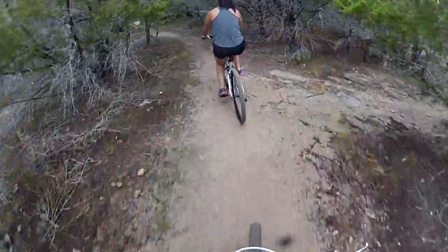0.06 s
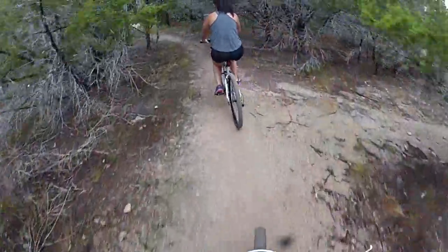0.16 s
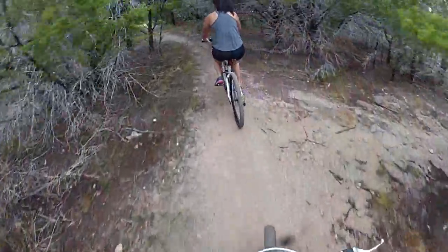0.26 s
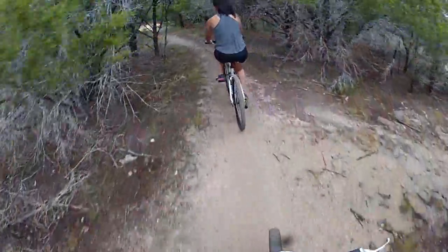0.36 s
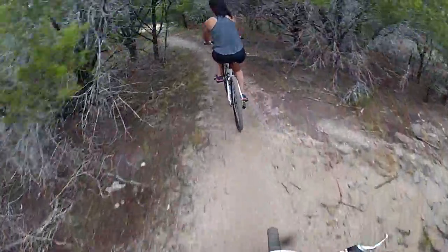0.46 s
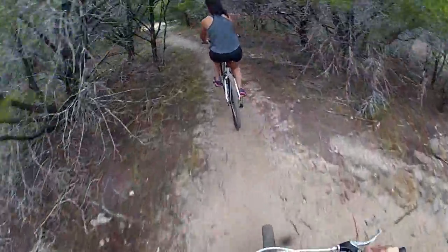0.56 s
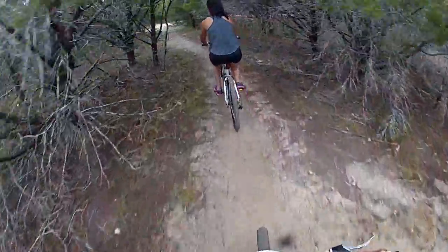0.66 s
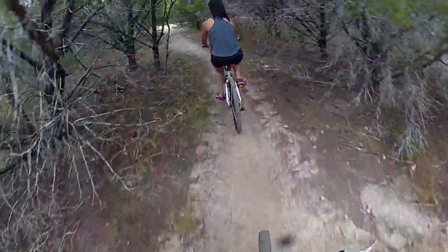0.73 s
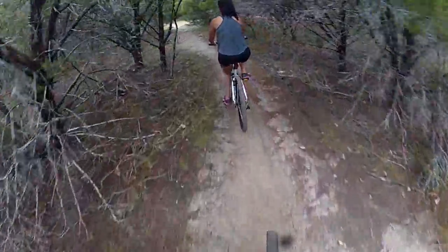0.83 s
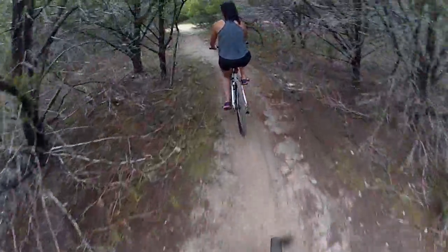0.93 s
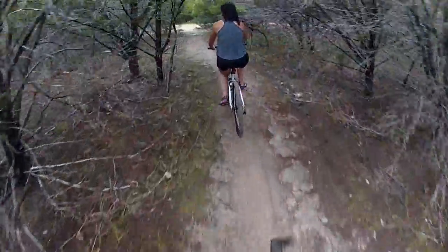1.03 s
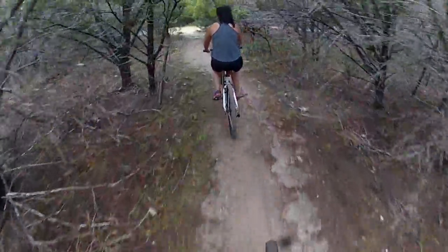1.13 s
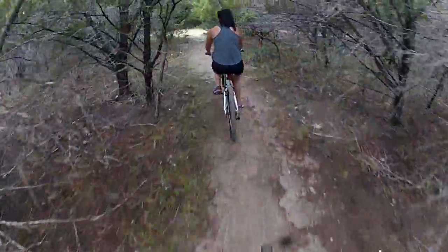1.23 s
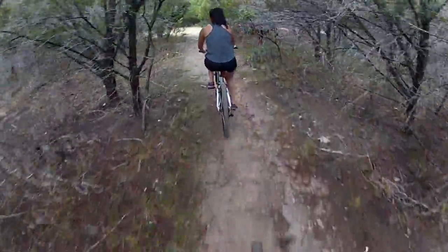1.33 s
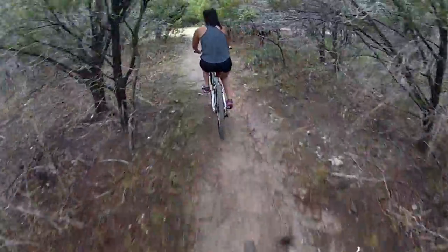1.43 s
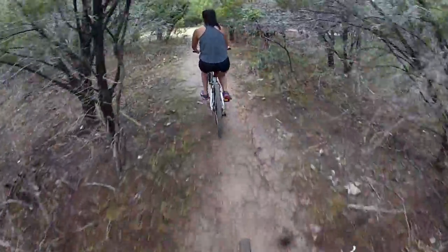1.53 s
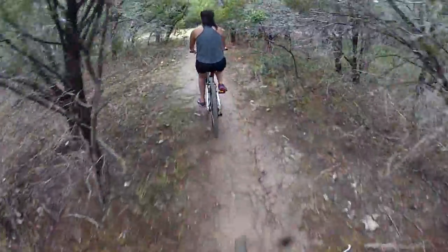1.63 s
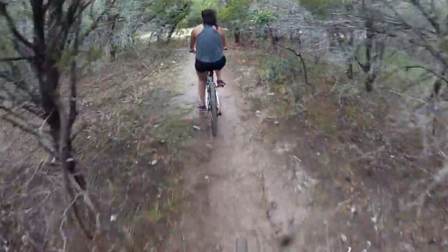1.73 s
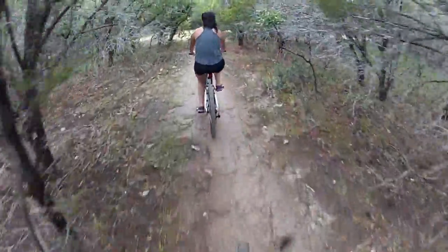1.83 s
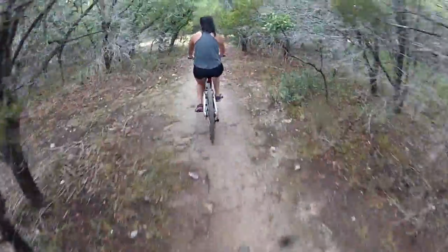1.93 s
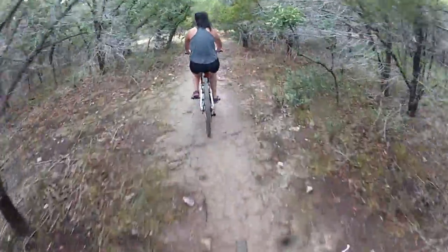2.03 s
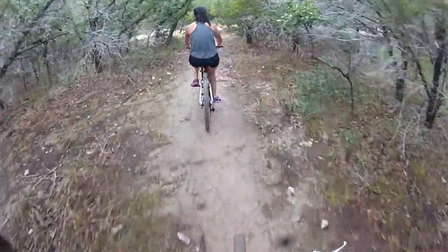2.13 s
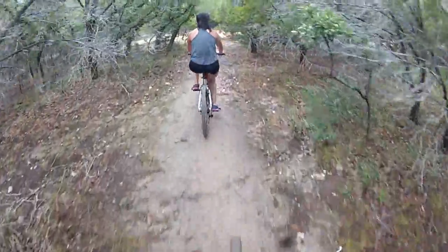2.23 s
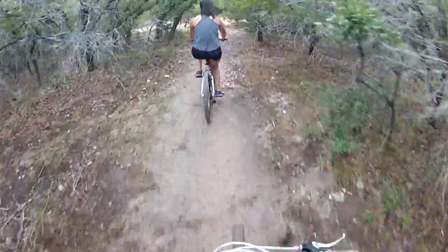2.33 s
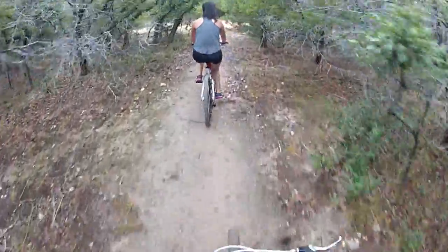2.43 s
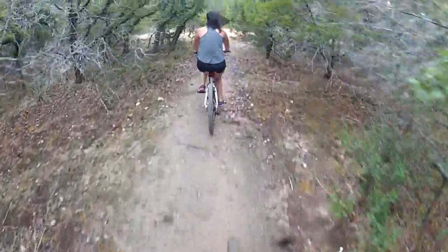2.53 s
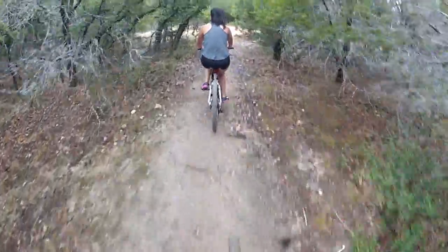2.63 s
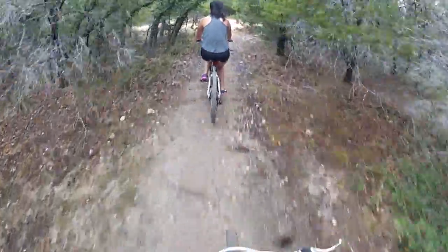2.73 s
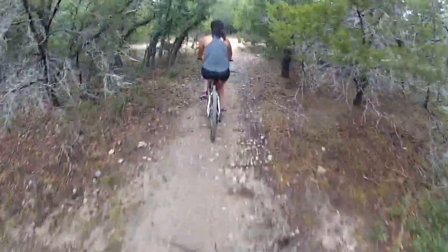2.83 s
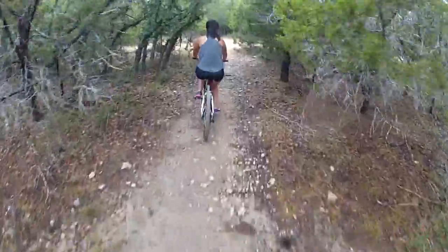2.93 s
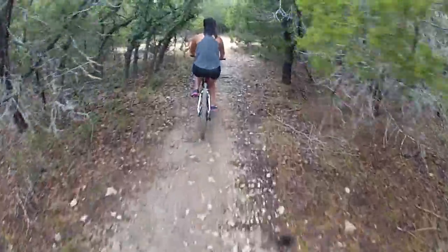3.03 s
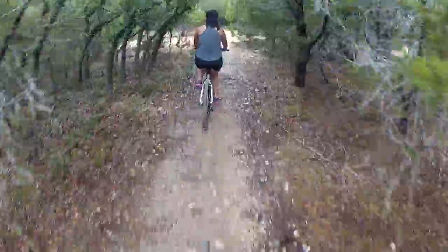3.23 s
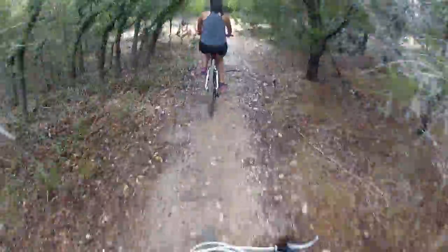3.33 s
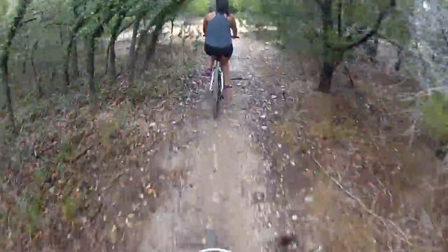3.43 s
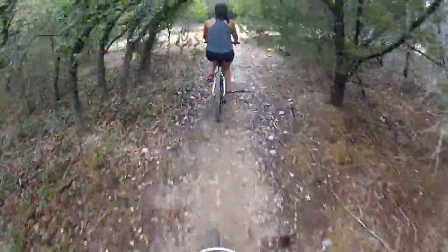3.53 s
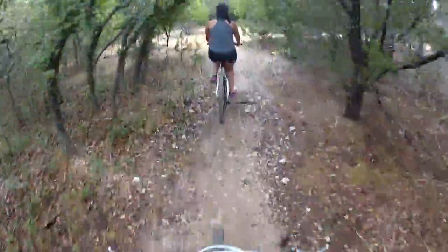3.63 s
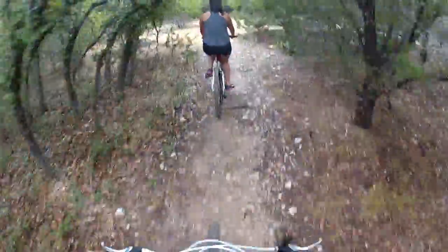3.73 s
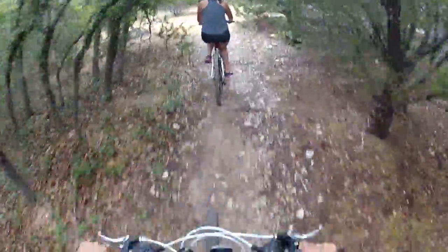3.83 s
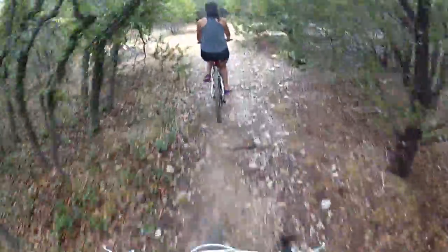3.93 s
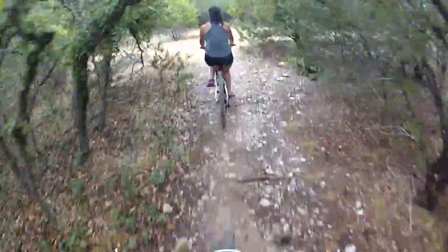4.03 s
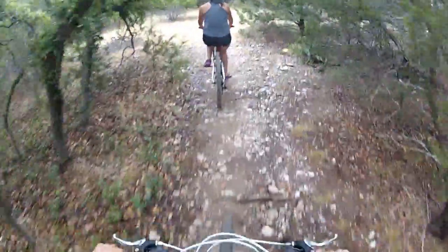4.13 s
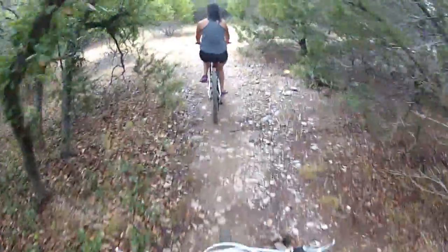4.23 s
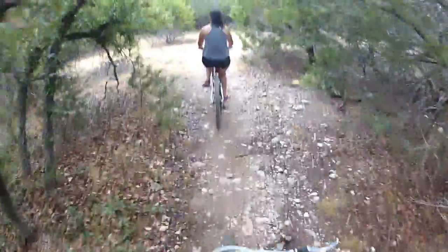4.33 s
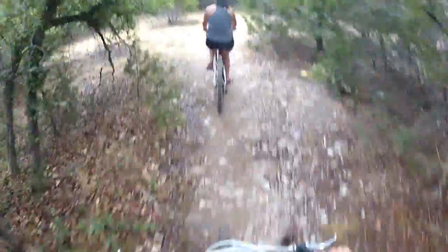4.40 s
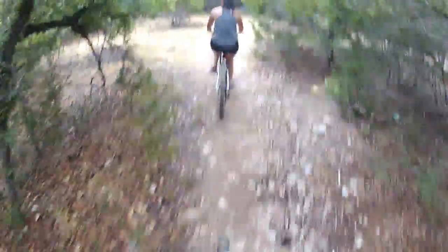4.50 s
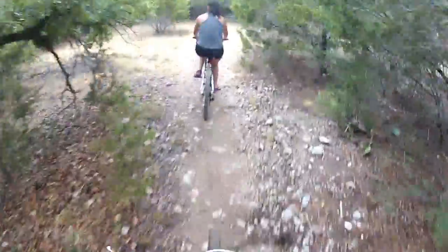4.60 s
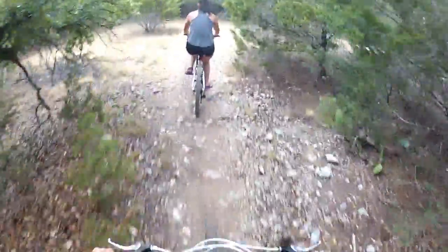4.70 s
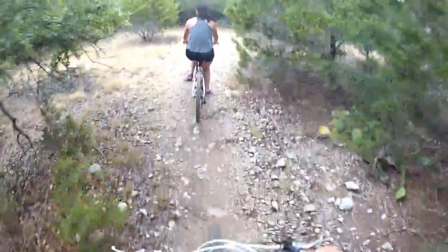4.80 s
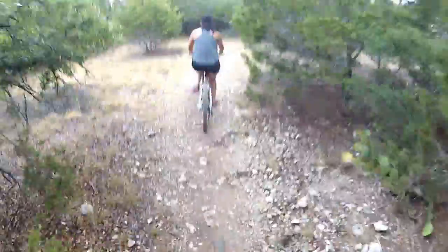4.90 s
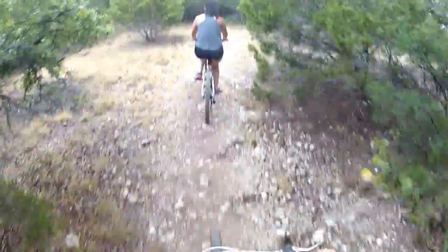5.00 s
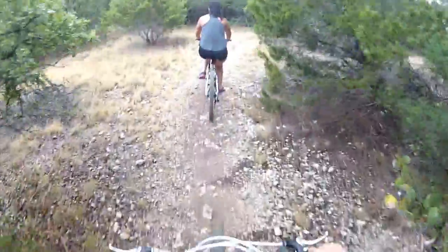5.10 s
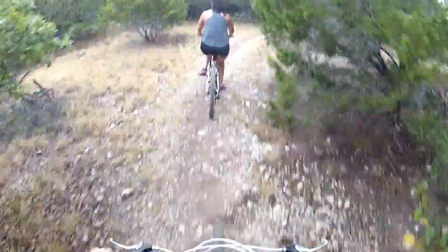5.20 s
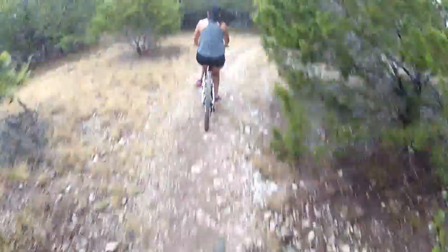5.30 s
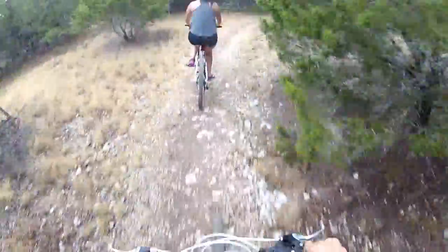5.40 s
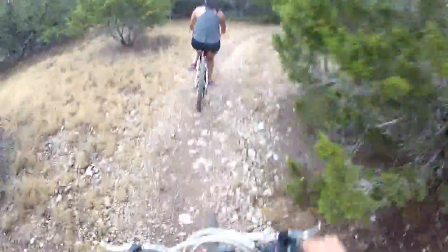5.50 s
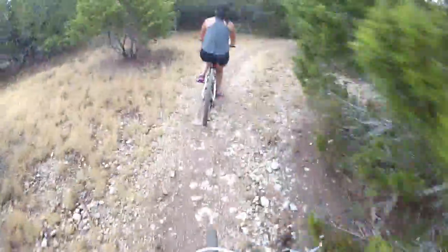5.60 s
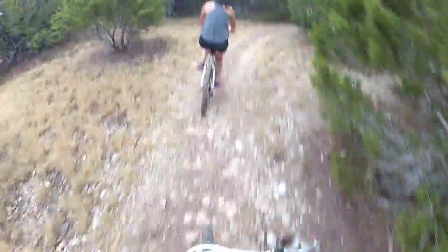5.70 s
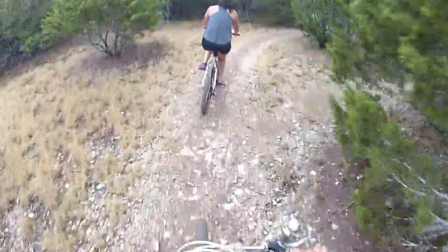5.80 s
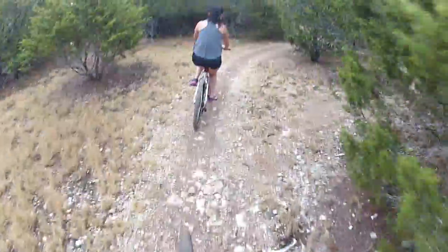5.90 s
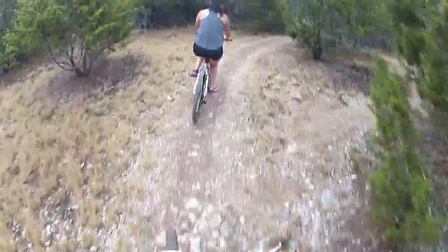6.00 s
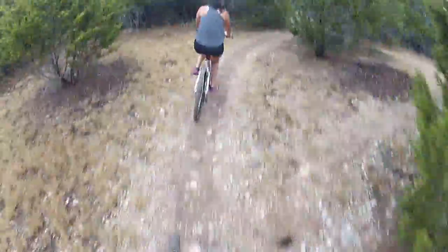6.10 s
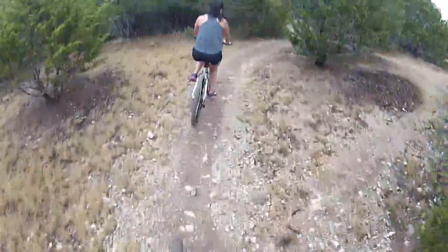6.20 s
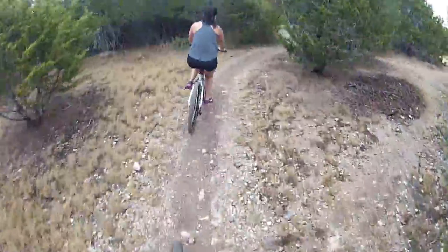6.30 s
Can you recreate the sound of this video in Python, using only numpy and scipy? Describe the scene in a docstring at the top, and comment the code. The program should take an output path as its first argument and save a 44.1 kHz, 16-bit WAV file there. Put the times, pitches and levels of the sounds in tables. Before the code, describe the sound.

Low wind buffets a microphone carried by a cyclist on an outdoor dirt trail. The tyres give a quiet hum and gritty hiss with occasional ticks, before the chain and cables start to rattle. Halfway through, the bike hits loose rock, and irregular sharp knocks, dull thuds and deep bumps build over a busy clatter. A few very faint, thin chirps sit far in the background.

```python
"""A mountain bike rolls from smooth dirt onto loose rock, heard from a camera on the rider.
The tyres hum, hiss and snap over grit while gusts and sway rumble on the microphone.
Stones knock through the frame and thud in the camera mount, chain and cables clatter
as the bike shakes, and deep jolts swing the camera. A few thin chirps sit far back."""
import sys
import numpy as np
from scipy import signal
from scipy.fft import rfft, irfft
from scipy.io import wavfile
from scipy.ndimage import uniform_filter1d

SR = 44100
rng = np.random.default_rng(int(sys.argv[2]) if len(sys.argv) > 2 else 0)


def output_pcm(signal):
    """Save a mono or channel-first signal as 16-bit PCM at the path in sys.argv[1].

    Samples are clipped to [-1, 1] before scaling.
    """
    pcm = np.clip(np.atleast_2d(signal).T, -1, 1) * 32767
    wavfile.write(sys.argv[1], SR, np.round(pcm).astype(np.int16))


N = 280035
TIME = np.arange(N) / SR


def from_db(db):
    """Decibels to gain."""
    return 10 ** (np.asarray(db) / 20)


def rms_one(x):
    """Scale to rms 1."""
    return x / np.sqrt(np.mean(x ** 2) + 1e-20)


def curve(points):
    """A fader move: straight lines through (time_s, value) points."""
    return np.interp(TIME, *np.transpose(points))


def cut(x, hz, kind, order=2):
    """Butterworth filter."""
    return signal.sosfilt(signal.butter(order, hz, kind, fs=SR, output="sos"), x + 1e-18)


def noise(colour):
    """Noise coloured by (freq_hz, gain_db) points, rms 1."""
    hz, db = np.transpose(colour)
    bins_hz = np.fft.rfftfreq(N, 1 / SR)
    shape_db = np.interp(np.log(bins_hz + 1), np.log(hz), db, right=-120)
    return rms_one(irfft(rfft(rng.standard_normal(N)) * from_db(shape_db), N))


def drift(per_s):
    """A random wander with a spread near 1."""
    return np.interp(TIME * per_s, np.arange(N), rng.standard_normal(N))


def steady(x, samples):
    """Even out the swells of a noise over a sliding window."""
    return x / np.sqrt(uniform_filter1d(x * x, samples) + 1e-9)


def resonance(x, hz, width_hz):
    """Two-pole resonance with gain 1 at its peak."""
    radius = np.exp(-np.pi * width_hz / SR)
    feedback = [1, -2 * radius * np.cos(2 * np.pi * hz / SR), radius ** 2]
    return signal.lfilter(np.array([1, 0, -1]) * (1 - radius ** 2) / 2, feedback, x + 1e-18)


def grains(per_s, spread_db):
    """Tiny contacts at random moments and of uneven size, rms 1."""
    sizes = from_db(spread_db * np.minimum(rng.exponential(1, N), 3))
    signs = rng.choice([-1, 1], N)
    return rms_one(sizes * signs * (rng.random(N) < per_s / SR))


def add(track, start_s, sound):
    """Mix a sound into a track from start_s on."""
    at = max(0, round(start_s * SR))
    track[at:at + len(sound)] += sound[:max(0, N - at)]


def hump(peak_s, width_s):
    """A bell-shaped swell of height 1."""
    return np.exp(-.5 * np.minimum(((TIME - peak_s) / width_s) ** 2, 100))


# Fader of the tread hum, before trim and roughness: time_s, level_db
HUM_LEVEL = [(0.0, -68), (1.64, -66.5), (4.4, -63.5), (4.54, -61.5), (5.09, -67), (5.64, -64), (5.92, -66),
             (6.35, -64)]
# Low, warm colour of the tread: freq_hz, gain_db
HUM_COLOUR = [(50, -6), (90, -2.5), (130, 1.5), (190, -0.5), (260, -3), (350, -6.5), (500, -12),
              (800, -20.5), (2000, -56)]


def tyre_hum(trim_db=2.0, rough_loss_db=-4):
    """The tread hums on packed dirt and loses some of its hum on rough ground."""
    rough_db = curve(TRAIL_ROUGHNESS)
    looseness = (rough_db - rough_db.min()) / np.ptp(rough_db)
    level = from_db(curve(HUM_LEVEL) + trim_db + rough_loss_db * looseness)
    return level * steady(noise(HUM_COLOUR), samples=2500)


# Fader of the dirt under the tyres, held after its last point: time_s, level_db
DIRT_LEVEL = [(0, -70.5), (.25, -74.5), (1.25, -74), (1.42, -74), (2.4, -75)]
# Colour of the dirt hiss: freq_hz, gain_db
DIRT_COLOUR = [(290, -45), (500, -5), (847, -8), (1130, -1), (1230, -5), (1650, -11.5), (2130, -4.5),
               (2610, -7.5), (2880, -8.5), (5160, -17.5), (6120, -18.5), (8860, -21.5), (11400, -34),
               (15000, -24)]


def dirt_hiss(grit_db=-13, grit_hz=2880):
    """Tyres on packed dirt: a soft hiss with tiny ringing ticks of grit."""
    hiss = from_db(1.15 * drift(per_s=90)) * noise(DIRT_COLOUR)
    ticks = resonance(grains(per_s=400, spread_db=7.5), grit_hz, width_hz=170)
    return from_db(curve(DIRT_LEVEL)) * (hiss + from_db(grit_db) * rms_one(ticks))


# Gusts at the microphone: time_s, level_db
GUST_LEVEL = [(0, -59), (0.6, -55), (0.73, -70.5), (1.19, -41.5), (1.29, -58.5), (1.43, -50.5), (1.57, -64),
              (1.76, -47), (1.87, -57.5), (2.08, -54), (2.68, -58), (2.82, -41), (3.15, -55.5), (3.53, -38),
              (3.62, -51.5), (4.19, -44), (4.27, -72), (6.35, -67)]
# Sub-heavy colour of the buffeting: freq_hz, gain_db
WIND_COLOUR = [(15, -4), (32, 8.5), (50, -5.5), (70, -11.5), (100, -35.5), (160, -42.5), (400, -72)]


def wind(shake, sway_db=5.0, flutter_db=4.5):
    """Gusts buffet the microphone, and so does the swaying of the camera as the bike shakes."""
    gusts = from_db(curve(GUST_LEVEL) + flutter_db * drift(per_s=15))
    sway = from_db(sway_db) * uniform_filter1d(shake, size=3500)
    return np.hypot(gusts, sway) * steady(noise(WIND_COLOUR), samples=3600)


# Bed of shaking that the trail keeps up: time_s, level_db
TRAIL_ROUGHNESS = [(0, -67.5), (2.4, -64.5), (3.3, -62), (3.7, -57.5), (4.28, -56), (4.36, -51),
                   (4.5, -57.5), (4.95, -49.5), (5.1, -48.5), (5.23, -58.5), (5.31, -53.5), (5.43, -54.5),
                   (5.66, -44), (5.92, -53), (5.98, -47.5), (6.06, -50.5), (6.35, -50.5)]
# Bumps that shake chain and cables into a clatter: peak_s, level_db
CLATTER_BUMPS = [(2.474, -46.5), (2.516, -45.5), (2.761, -49), (2.793, -47.5), (2.926, -45), (3.745, -44.5),
                 (3.837, -44), (3.967, -49.5), (4.355, -54), (4.419, -46), (4.538, -43.5), (5.027, -45),
                 (5.155, -40.5), (5.375, -40.5), (5.462, -40), (5.492, -38), (5.545, -52), (5.609, -44),
                 (6.022, -40), (6.176, -40.5)]


def shaking(climb_db=-10, climb_lead_s=0.029, clatter_db=-0.5, clatter_lag_s=0.014, rise_s=0.0059):
    """Envelope of the bike's shaking: the trail's bed, swelling at bumps and around each stone."""
    power = from_db(curve(TRAIL_ROUGHNESS)) ** 2
    for peak_s, db in CLATTER_BUMPS:
        power += (from_db(db) * hump(peak_s, width_s=0.01)) ** 2
    age = TIME[:SR // 4] / rise_s
    swell = (age / 2) ** 2 * np.exp(2 - age)  # fast attack, peak at twice rise_s, slower release
    clatter = np.zeros(N)
    for hit_s, crack_db, thud_db in STONE_HITS:
        # The tyre climbs the stone before the hit; loose parts clatter after it.
        power += (from_db(crack_db + climb_db) * hump(hit_s - climb_lead_s, width_s=0.013)) ** 2
        gain = from_db(crack_db + clatter_db) * stone_weight(thud_db)
        add(clatter, hit_s + clatter_lag_s - 2 * rise_s, gain * swell)
    flicker = from_db(3.0 * drift(per_s=130))
    return np.hypot(np.sqrt(power), clatter) * flicker


def rattle(shake):
    """Force of chain, cables and gravel: dense contacts as strong as the shaking."""
    return shake * steady(grains(per_s=4000, spread_db=3.5), samples=400)


# Modes of the frame and camera housing: pitch_hz, width_hz, gain_db
FRAME_MODES = [(449, 180, -3.5), (938, 69, -4), (1146, 107, 0), (1825, 106, 2), (2105, 170, -3),
               (2450, 170, -5), (2850, 93, -5.5), (3515, 165, -8), (3752, 99, -8), (5190, 260, -16)]


def frame_ring(force, rolloff_hz=4300):
    """Every contact rings the same modes, in alternating polarity; the mount dulls the top end."""
    rings = sum((-1) ** k * from_db(db) * resonance(force, hz, width_hz)
                for k, (hz, width_hz, db) in enumerate(FRAME_MODES))
    return cut(rings, rolloff_hz, "low", order=3)


def shudder(shake, mount_db=-16, mount_hz=262, tyre_db=-15, tyre_hz=95):
    """Rough ground keeps the camera mount and the tyres ringing."""
    mount = rms_one(cut(resonance(rng.standard_normal(N), mount_hz, width_hz=65), 360, "low"))
    tyre = rms_one(cut(resonance(rng.standard_normal(N), tyre_hz, width_hz=51), 140, "low"))
    return shake * (from_db(mount_db) * mount + from_db(tyre_db) * tyre)


# Grit and twigs under the tyres, levels before the band-pass: start_s, level_db, decay_s
TWIG_SNAPS = [(0.33, -68.5, 0.018), (0.5, -58, 0.0022), (0.508, -52, 0.0026), (1.915, -66, 0.02),
              (1.944, -58, 0.002), (2.128, -58, 0.0022), (2.289, -60, 0.004)]


def twig_snaps(band_hz=(2200, 4800)):
    """Small bright cracks and scrapes that reach the microphone through the air."""
    out, age = np.zeros(N), TIME[:SR // 20]
    for start_s, db, decay_s in TWIG_SNAPS:
        add(out, start_s, from_db(db) * rng.standard_normal(len(age)) * np.exp(-age / decay_s))
    return cut(out, band_hz, "band")


# Stones striking the wheels, levels relative: start_s, crack_db, thud_db
STONE_HITS = [(0.857, -53, -74.5), (1.613, -52.5, -67), (3.479, -46.5, -62), (3.522, -38.5, -55),
              (3.551, -40, -96), (3.764, -49, -54), (3.774, -37.5, -52), (3.863, -47, -53.5),
              (3.879, -40, -58), (4.003, -43, -57.5), (4.105, -47.5, -76), (4.179, -41, -69),
              (4.424, -50.5, -52), (4.461, -36.5, -50.5), (4.568, -31.5, -42.5), (4.668, -40.5, -49.5),
              (4.677, -35, -51), (4.731, -42, -50.5), (4.781, -45.5, -56), (4.848, -46.5, -81),
              (4.885, -43.5, -73), (5.001, -33, -42.5), (5.129, -38, -46), (5.348, -37, -47),
              (5.456, -41, -56), (5.67, -45, -47), (5.719, -31, -37.5), (5.859, -33, -40.5),
              (6.145, -44.5, -52.5), (6.272, -32, -40)]


def stone_knocks(click_db=24, push_db=27, contact_s=0.0013, crunch_db=3, attack_s=0.00057,
                 decay_s=0.0055, rebound_s=0.0075, rebound_db=-6):
    """Force of each stone: a sharp click, a dull push, a crunchy tail, then a softer rebound."""
    force, age = np.zeros(N), TIME[:SR // 10]
    crunch = from_db(crunch_db) * np.exp(-age / decay_s) * (1 - np.exp(-age / attack_s))
    push = from_db(push_db) * np.exp(-age / contact_s) / (contact_s * SR)
    for start_s, crack_db, thud_db in STONE_HITS:
        rebound = from_db(rebound_db) * stone_weight(thud_db)
        for lag_s, gain in ((0, 1), (rebound_s, rebound)):
            crack = crunch * rng.standard_normal(len(age))
            crack[0] = -from_db(click_db)
            add(force, start_s + lag_s, gain * (from_db(crack_db) * crack - from_db(thud_db) * push))
    return force


def stone_weight(thud_db, hard_thud_db=-36, db_per_db=0.22):
    """Gain of a stone's rebound and clatter: 1 for a hard thud, less for lighter ones."""
    return from_db(db_per_db * (thud_db - hard_thud_db))


def stone_thuds(mount_db=12.5, mount_hz=255, mount_s=0.0048, tyre_db=4, tyre_hz=112, tyre_s=0.014):
    """Each stone sets the camera mount ringing briefly, over the duller bump of the tyre."""
    out, age = np.zeros(N), TIME[:SR // 10]
    for start_s, _, thud_db in STONE_HITS:
        mount_tune, tyre_tune = rng.normal(1, 0.063, 2)
        mount = np.sin(2 * np.pi * mount_hz * mount_tune * age) * np.exp(-age / mount_s)
        tyre = np.sin(2 * np.pi * tyre_hz * tyre_tune * age) * np.exp(-age / tyre_s)
        add(out, start_s, from_db(thud_db) * (from_db(tyre_db) * tyre - from_db(mount_db) * mount))
    return out


# Thin, faint chirps: start_s, level_db, length_s, end_pitch_hz
THIN_CHIRPS = [(2.25, -74, 0.015, 6960), (3.526, -71, 0.019, 7000), (4.236, -66.5, 0.03, 7080),
               (5.063, -68.5, 0.021, 6730), (5.382, -69, 0.018, 6960), (5.913, -69, 0.031, 6880),
               (6.305, -67, 0.024, 6800)]


def chirps(start_hz=6500, rasp_hz=110):
    """Short whistles that slide up from a common pitch, with a rasp in pitch and level."""
    out, waver_hz = np.zeros(N), rasp_hz * drift(per_s=900)
    for start_s, db, length_s, end_hz in THIN_CHIRPS:
        along = np.linspace(0, 1, int(length_s * SR))
        pitch_hz = end_hz + (start_hz - end_hz) * (1 - along) ** 3
        pitch_hz += np.interp(start_s + along * length_s, TIME, waver_hz)
        whistle = np.sin(2 * np.pi * np.cumsum(pitch_hz) / SR)
        add(out, start_s, from_db(db) * np.sin(np.pi * along) * whistle)
    return out * from_db(1.1 * drift(per_s=290))


# Deep jolts that swing the camera, levels before trim: centre_s, level_db
DEEP_JOLTS = [(3.518, -34.5), (3.783, -29), (4.47, -27.5), (4.584, -32), (4.68, -27), (4.973, -34),
              (5.021, -26.5), (5.46, -31.5), (5.682, -31), (5.738, -22.5), (5.817, -33), (5.847, -36),
              (6.29, -26)]


def jolts(width_s=0.006, trim_db=4.5, stiffening_per_db=0.024, recoil=0.41):
    """A deep bump lifts the camera, drops it and throws it back higher; harder ones are tighter."""
    out, mean_db = np.zeros(N), np.mean(DEEP_JOLTS, axis=0)[1]
    for centre_s, db in DEEP_JOLTS:
        swing_s = width_s * np.exp(-stiffening_per_db * (db - mean_db))
        offset = (TIME - centre_s) / swing_s
        swing = (offset ** 2 - 1) * np.exp(-.5 * offset ** 2)
        out += from_db(db + trim_db) * swing * (1 + recoil * offset)
    return out


def scene():
    """Mono mix: the bike's knocks and rattle over a bed of tyre hum, wind and dirt."""
    shake = shaking()
    frame = frame_ring(stone_knocks() + rattle(shake))
    low_end = stone_thuds() + jolts() + shudder(shake)
    bed = tyre_hum() + wind(shake) + dirt_hiss()
    return (frame + low_end + bed + twig_snaps() + chirps())[None]


def record(dry, mirror_hz=12000, mirror_db=-2, notch_width_hz=700, rolloff_hz=14200, cutoff_hz=15300):
    """The camera mirrors the sound faintly around mirror_hz, dips at half that and cuts the top."""
    slope = cut(np.diff(dry, prepend=dry[:, :1]), 50, "high", order=1)
    wet = dry + from_db(mirror_db) * slope * 2 * np.cos(2 * np.pi * mirror_hz * TIME)
    wet -= 0.73 * resonance(wet, mirror_hz / 2, notch_width_hz)
    wet = cut(wet, rolloff_hz, "low")
    brick_wall = signal.ellip(10, .2, 70, cutoff_hz, fs=SR, output="sos")
    return signal.sosfilt(brick_wall, wet)


dry = scene()
out = record(dry)
output_pcm(out)
```